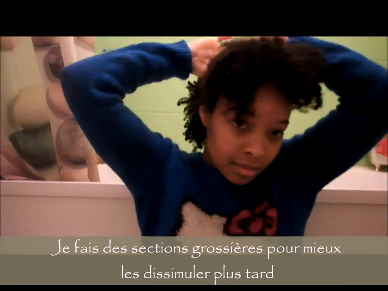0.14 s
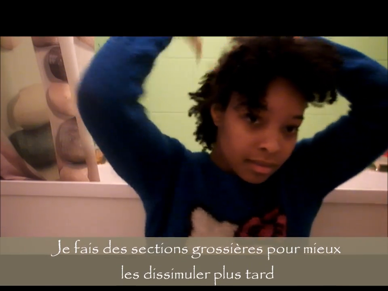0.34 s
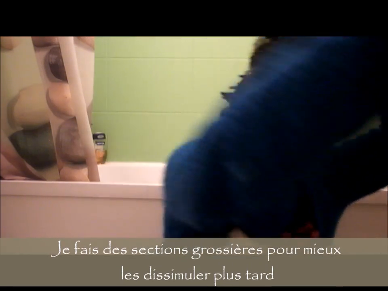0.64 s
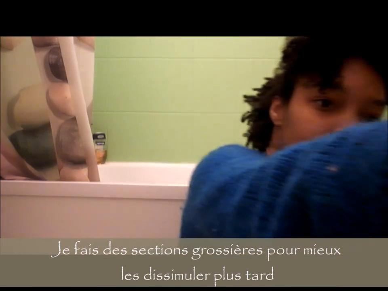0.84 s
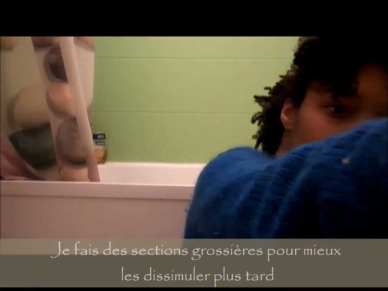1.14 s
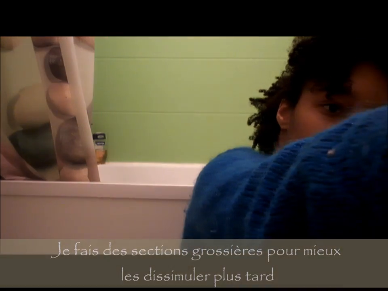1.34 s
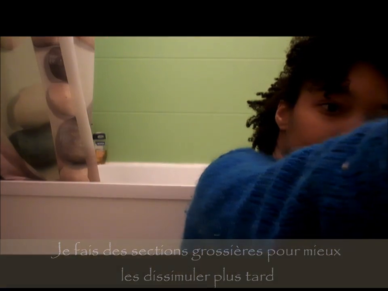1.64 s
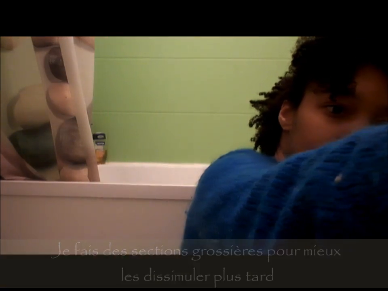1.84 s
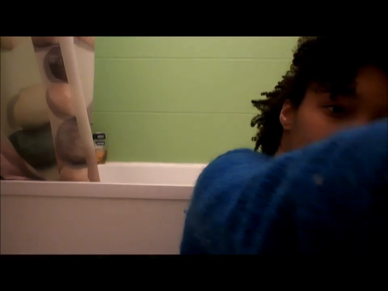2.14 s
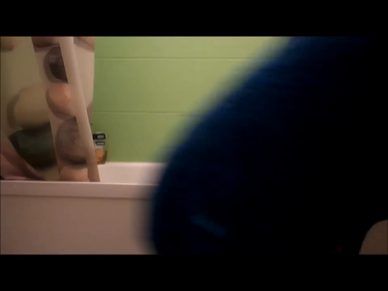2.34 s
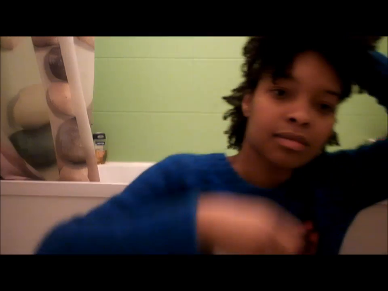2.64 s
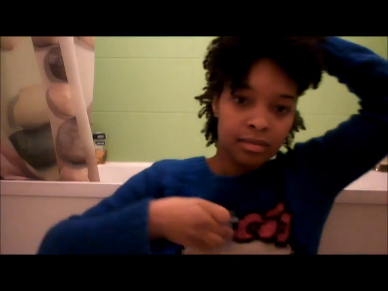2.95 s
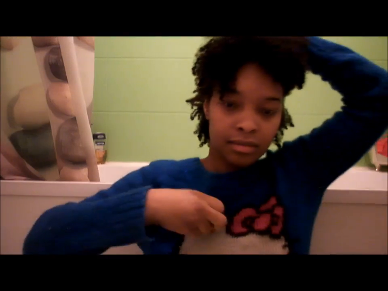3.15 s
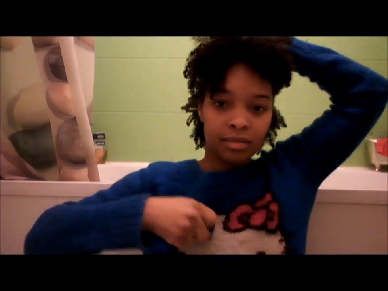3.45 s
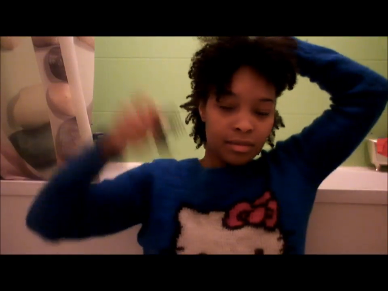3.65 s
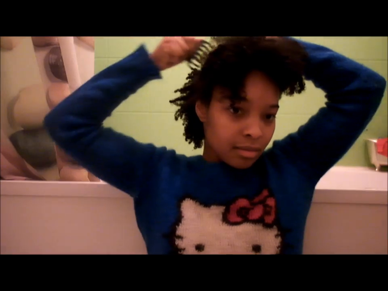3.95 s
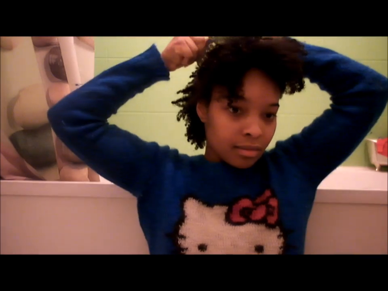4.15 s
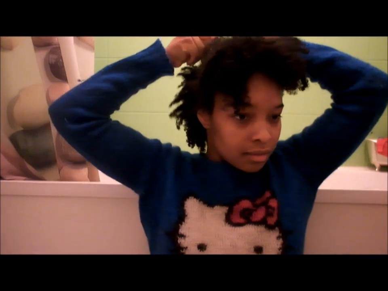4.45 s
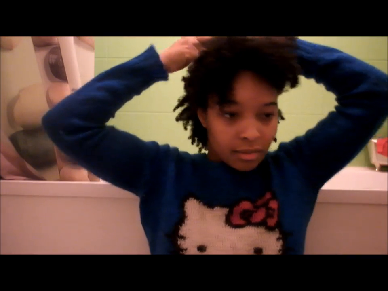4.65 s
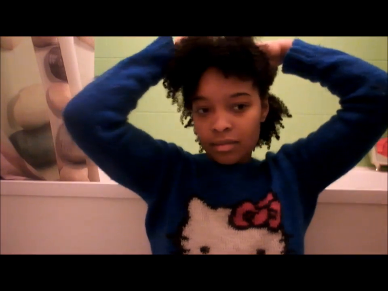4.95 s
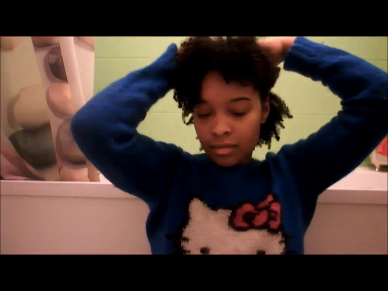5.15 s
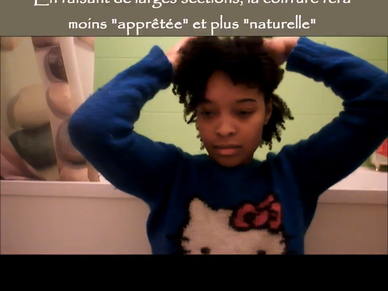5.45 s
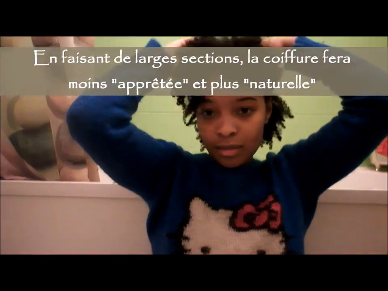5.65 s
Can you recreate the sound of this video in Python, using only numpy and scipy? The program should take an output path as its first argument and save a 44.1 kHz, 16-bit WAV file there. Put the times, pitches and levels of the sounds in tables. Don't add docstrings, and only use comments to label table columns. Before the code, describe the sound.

Soft hair rustle and tiny plastic clicks, then a loud burst of plastic clattering on a counter, then scattered sharp clicks in a small tiled bathroom.

```python
import sys
import numpy as np
from scipy import signal
from scipy.fft import rfft, irfft, next_fast_len
from scipy.io import wavfile

SR = 44100
rng = np.random.default_rng(int(sys.argv[2]) if len(sys.argv) > 2 else 0)


def wav_record(signal):
    frames = np.transpose(np.atleast_2d(signal))
    bounded = np.clip(frames, -1, 1)
    quanta = np.round(bounded * 32767).astype(np.int16)
    wavfile.write(sys.argv[1], SR, quanta)


def ratio_of_db(decibels):
    return 10 ** (np.asarray(decibels, float) / 20)


N = 256220
PLACES = 4


def evened(x):
    return x / np.sqrt(np.mean(x ** 2) + 1e-20)


def read(points, hz):
    point_hz, value = np.transpose(points)
    return np.interp(np.log(hz + 1), np.log(point_hz + 1), value)


def coloured(x, points):
    size = next_fast_len(len(x))
    gain = ratio_of_db(read(points, np.fft.rfftfreq(size, 1 / SR)))
    return irfft(rfft(x, size) * gain, size)[:len(x)]


def add(mix, start_s, sound):
    part = mix[round(start_s * SR):][:len(sound)]
    part += sound[:len(part)]


def ring(hz, t60):
    t = np.arange(6000) / SR
    pair = np.sin(2 * np.pi * hz * t) + 0.5 * np.sin(2 * np.pi * hz * 1.079 * t)
    return ratio_of_db(-60 * t / t60) * pair * np.minimum(t * hz, 1)


def grains(per_s, spread_db):
    size = ratio_of_db(spread_db * np.minimum(rng.exponential(1, N), 5))
    happens = rng.random(N) < per_s / SR
    return evened(size * rng.standard_normal(N) * happens)


def moves(peak_s, length_s, peak_db, end_db):
    off = abs(np.arange(N) / SR - peak_s[:, None]) / (length_s[:, None] / 2)
    each = ratio_of_db(peak_db[:, None] + end_db * off ** 1.4)
    return np.sqrt((each ** 2).sum(0))


# pitch_hz, level_db (per Hz)
FLOOR_COLOUR = [(12, -55.5), (20, -29.5), (48, -34.5), (69, -15.5), (117, -3.5), (153, -11.5), (217, 0),
                (252, -8.5), (493, -11), (572, -11.5), (617, -12), (1210, -16), (2950, -20), (5910, -24.5),
                (7580, -22), (9850, -82), (16700, -120)]
# pitch_hz, width_hz, level_db
FAN_HUM = (240, 130, -54.5)
# time_s, level_db
GAIN_DRIFT = [(0.0, 1), (0.352, 0), (0.776, 2), (0.98, 0.8), (2.2, -4), (2.65, -0.9), (3.32, -1.5),
              (3.57, -1), (4.21, -1.7), (4.62, 0.5), (5.81, -0.05)]


def floor():
    drift_s, drift_level_db = np.transpose(GAIN_DRIFT)
    drift_db = np.interp(np.arange(N) / SR, drift_s, drift_level_db)
    noise = coloured(rng.standard_normal(N), FLOOR_COLOUR)
    hiss = evened(noise - coloured(noise, [(500, 0.5), (1100, -18.5), (2500, -39.5)]))
    rumble = evened(coloured(noise, [(500, 4), (1100, -15.5), (2500, -58)]))
    hum_hz, width_hz, hum_db = FAN_HUM
    hum = signal.lfilter(*signal.iirpeak(hum_hz, hum_hz / width_hz, SR), rng.standard_normal(N))
    rumble = rumble + ratio_of_db(hum_db + 46.5) * evened(hum)
    return ratio_of_db(-51 + drift_db) * hiss + ratio_of_db(-48 + 0.65 * drift_db) * rumble


# pitch_hz, level_db
RUSTLE_COLOUR = [(800, -33.5), (2000, -18), (3000, 1), (4600, 2), (6500, -3), (8000, 0.5)]
# peak_s, length_s, level_db
HAIR_STROKES = [(.05, 0.23, -44), (0.357, 0.18, -38.5), (.7, 0.78, -48.5), (2.856, 0.99, -49.5),
                (3.395, 0.18, -48), (4.834, 0.47, -47), (4.897, .07, -36.5), (5.1, 0.19, -43),
                (5.338, 0.11, -42), (5.685, 0.55, -48.5)]


def rustle():
    crackle = evened(coloured(grains(8500, 1.4), RUSTLE_COLOUR))
    return moves(*np.transpose(HAIR_STROKES), end_db=-23.5) * crackle


# pitch_hz, level_db, t60_s (time to fall 60 dB)
COUNTER_MODES = [(686, -7.5, 0.087), (853, -10, 0.081), (1160, -5, 0.039), (1633, -4, 0.013),
                 (2350, -66.5, 0.016), (3600, -12.5, 0.067)]


def blows(rows, low_t60, high_t60, tick_hz, lift_db, rattle_db, counter_db, room_db, late_s):
    direct, sends = np.zeros(N), np.zeros((PLACES, N))
    chance = rng.standard_normal((len(rows), 2000))
    t = np.arange(6000) / SR
    modes = [ratio_of_db(db - 60 * t / t60) * np.sin(2 * np.pi * hz * t) for hz, db, t60 in COUNTER_MODES]
    counter = sum(modes) * np.minimum(t / 0.0024, 1)
    tick = signal.lfilter(*signal.butter(2, [tick_hz, 9000], "band", fs=SR), t == 0)
    tick = tick / tick.max()
    tick_lift, low_lift, high_lift = ratio_of_db(lift_db)
    for k, (start_s, tick_db, low_hz, low_db, high_hz, high_db) in enumerate(rows):
        low = ring(low_hz, low_t60) + ratio_of_db(counter_db) * counter
        sound = tick_lift * ratio_of_db(tick_db) * tick
        sound = sound + low_lift * ratio_of_db(low_db) * low
        sound = sound + high_lift * ratio_of_db(high_db) * ring(high_hz, high_t60)
        happens = abs(chance[k]) > 2.0
        bounces = ratio_of_db(rattle_db - 60 * t[:2000] / 0.048) * np.sign(chance[k]) * happens
        sound = sound + signal.fftconvolve(sound, bounces)[:6000]
        add(direct, start_s + late_s, sound)
        add(sends[k % PLACES], start_s + late_s, ratio_of_db(room_db) * sound)
    return direct, sends


# start_s, tick_db, ring_db, low_jaw_hz, high_jaw_hz
CLIP_SNAPS = [(0.051, -50, -42.5, 2990, 5100), (0.2885, -46, -42, 3130, 4730),
              (0.3699, -32.5, -32, 3090, 3530), (3.079, -27, -32.5, 2640, 6970),
              (3.3907, -60, -44, 2660, 6800), (3.6755, -36.5, -26.5, 2630, 4400),
              (3.703, -22, -18.5, 2550, 4930), (4.7066, -35, -28.5, 2860, 3700),
              (4.7433, -23.5, -22.5, 3470, 4830), (4.7523, -30.5, -29, 2860, 3560),
              (5.2443, -32.5, -33.5, 2130, 3200)]
# start_s, level_db, pitch_hz
TOOTH_PLUCKS = [
    (0.058, -42, 3120),
    (0.384, -30, 4300),
    (3.0366, -43, 6460),
    (5.2538, -28, 4720),
    (5.6556, -40.5, 4760),
]


def clip_snaps():
    rows = [(s, tick_db, low_hz, ring_db, high_hz, ring_db)
            for s, tick_db, ring_db, low_hz, high_hz in CLIP_SNAPS]
    rows += [(s, db - 24, hz * 0.635, db - 8, hz, db) for s, db, hz in TOOTH_PLUCKS]
    return blows(rows, low_t60=0.011, high_t60=0.011, tick_hz=3200, lift_db=[11, 5, 4.5],
                 rattle_db=-40, counter_db=-40, room_db=0.6, late_s=0.001216)


NAIL_FLICKS = [
    (0.337, -30, 3600),
    (3.063, -31, 3730),
    (3.6721, -24, 2400),
    (2.4925, -32.5, 2500),
    (2.6833, -40, 2520),
    (2.915, -36, 2530),
    (3.419, -36, 2900),
]


def nail_flicks():
    rows = [(s, db, hz, db, 1.35 * hz, db) for s, db, hz in NAIL_FLICKS]
    return blows(rows, low_t60=0.005, high_t60=0.005, tick_hz=1500, lift_db=[-3, 3, -2],
                 rattle_db=-40, counter_db=-40, room_db=-8.5, late_s=0.0012)


# start_s, level_db, pitch_hz
COUNTER_THUMPS = [(1.01, -29, 211), (1.042, -24.5, 199), (1.066, -21.5, 411), (1.129, -26, 592),
                  (1.278, -35.5, 423), (1.424, -28, 236.4), (1.455, -29, 380), (1.629, -22.5, 294),
                  (1.681, -15.5, 441), (1.735, -29, 293), (1.84, -9.5, 381), (1.856, -16.5, 280),
                  (1.881, -24, 451), (1.905, -35, 424), (1.995, -25.5, 523), (2.031, -24.5, 255),
                  (2.117, -51, 252)]


def thumps():
    out = np.zeros(N)
    for start_s, db, hz in COUNTER_THUMPS:
        t60 = 0.11 * ratio_of_db(-0.36 * (db + 21.5))
        add(out, start_s, ratio_of_db(db - 2.5) * ring(hz, t60))
    return out


# start_s, blow_db, edge_hz, body_db, body_hz
KNOCKS = [
    (1.0314, -19, 2640, -38, 1670),
    (1.0444, -22, 2410, -17, 1014),
    (1.0685, -3, 2700, -15.5, 1160),
    (1.1273, -12, 3000, -58, 608),
    (1.6788, -9, 3240, -11.5, 1210),
    (1.7344, -31, 3060, -32.5, 1060),
    (1.8382, -4, 4230, 0, 1410),
    (1.8484, -8.5, 3000, -7.5, 877),
    (1.9001, -11.5, 2910, -19.5, 721),
]
# start_s, blow_db, edge_hz, body_db, body_hz
GLANCES = [
    (1.0101, -11, 6730, -23, 1470),
    (1.0744, -9, 2430, -14, 1500),
    (1.3982, -27.5, 2720, -30, 1500),
    (1.4556, -15.5, 2560, -24, 1110),
    (1.6844, -11.5, 4740, -14, 1470),
    (1.8444, -8, 2310, -9, 1130),
    (1.9114, -14, 4380, -22, 785),
]
# start_s, blow_db, edge_hz, body_db, body_hz
EDGE_CLICKS = [
    (1.4556, -31.5, 5900, -43, 1090),
    (1.6282, -28.5, 5000, -31, 810),
    (2.0283, -33.5, 5900, -41, 1600),
    (1.2196, -40, 6900, -42, 1080),
]


def knocks():
    rows = []
    for table, tick_db in ((KNOCKS, -2.1), (GLANCES, -41.5), (EDGE_CLICKS, 10.5)):
        rows += [(s, blow_db + tick_db, body_hz, body_db, edge_hz, blow_db)
                 for s, blow_db, edge_hz, body_db, body_hz in table]
    return blows(rows, low_t60=0.012, high_t60=0.0097, tick_hz=2350, lift_db=[4, 4, -3],
                 rattle_db=-7.5, counter_db=-9.5, room_db=-4.5, late_s=0.001157)


# pitch_hz, level_db (per Hz)
SCRAPE_COLOUR = [(59, -65), (100, -22.5), (266, -1), (549, -9.5), (746, -8.5), (928, -10.5), (2750, -11.5),
                 (3120, -18.5), (6210, -36), (7580, -38), (9850, -81.5), (16700, -120)]
# peak_s, length_s, scrape_db, scratch_db
SLIDES = [(1.045, 0.061, -21.5, -19), (1.096, 0.25, -29.5, -40), (1.13, 0.06, -33, -41),
          (1.298, 0.042, -33, -36), (1.395, 0.064, -33.5, -33), (1.452, 0.08, -29.5, -36),
          (1.56, 0.23, -39.5, -38.5), (1.661, .09, -28.5, -40.5), (1.726, 0.1, -28, -36),
          (1.855, .1, -29.5, -41), (1.895, 0.081, -30.5, -23), (1.952, 0.056, -29.5, -30),
          (2.024, 0.036, -27.5, -32.5), (2.118, 0.043, -30, -49)]


def rummage():
    hz = np.geomspace(100, 8000, 200)
    lift = sum(ratio_of_db(db) / (1 + ((hz - mode_hz) / 70) ** 2) for mode_hz, db, _ in COUNTER_MODES)
    slips = coloured(grains(6000, 1.6), np.c_[hz, 20 * np.log10(0.6 + lift)])
    body = evened(coloured(slips, np.vstack([SCRAPE_COLOUR, (9000, -79)])))
    stand = evened(coloured(slips, [(40, -25), (70, 2.5), (130, -2), (220, -18)]))
    body = body + ratio_of_db(-10.5) * stand
    scratch = evened(coloured(grains(1500, 1.1), RUSTLE_COLOUR))
    peak_s, length_s, scrape_db, scratch_db = np.transpose(SLIDES)
    sound = moves(peak_s, length_s, scrape_db, end_db=-8) * body
    sound = sound + moves(peak_s, length_s, scratch_db, end_db=-8) * scratch
    begun = np.arange(N) / SR > GLANCES[0][0]
    return begun * ratio_of_db(-4.0) * sound


# start_s, body_hz, body_db, edge_db
HOLLOW_TAPS = [
    (1.2784, 766, -35.5, -28),
    (1.4264, 610, -35, -23),
    (1.8178, 738, -24, -24),
    (1.9924, 1015, -21, -19),
    (2.0804, 742, -23.5, -24.5),
    (2.1144, 996, -37, -26),
]


def hollow_taps():
    rows = [(s, -26.5, body_hz, body_db, 1488, edge_db) for s, body_hz, body_db, edge_db in HOLLOW_TAPS]
    return blows(rows, low_t60=0.061, high_t60=0.015, tick_hz=2500, lift_db=[-6, -3, -3],
                 rattle_db=-2.0, counter_db=-45.5, room_db=-2.0, late_s=0.0008)


TOOTH_TICKS = [(2.5457, -32.5, 2600), (3.2206, -30, 2800), (3.511, -34.5, 2970), (3.573, -55, 2370),
               (4.8388, -37, 2740), (4.8787, -35.5, 2860), (4.952, -28, 2430), (5.0511, -30, 3560),
               (5.4595, -47.5, 3020), (5.704, -37.5, 2080), (5.7366, -42.5, 3320)]


def tooth_ticks():
    rows = [(s, db, low_hz, db - 10, 5120, db - 17) for s, db, low_hz in TOOTH_TICKS]
    return blows(rows, low_t60=0.011, high_t60=0.011, tick_hz=3330, lift_db=[8, 3, 3],
                 rattle_db=-40, counter_db=-40, room_db=6, late_s=0.0013)


# pitch_hz, t60_s (time to fall 60 dB)
ROOM_DECAY = [(200, 0.24), (1000, 0.13), (2500, 0.18), (4500, 0.22), (7500, 0.23)]


def room(sends):
    taps = rng.standard_normal((len(sends), SR // 2))
    hz, t, z = signal.stft(taps, SR, nperseg=256)
    decay = ratio_of_db(-60 * t / read(ROOM_DECAY, hz)[:, None])
    tails = signal.istft(z * decay, SR, nperseg=256)[1]
    gap_s, build_s = 0.001, 0.012
    tails = tails * np.sqrt(np.clip((np.arange(tails.shape[1]) / SR - gap_s) / build_s, 0, 1))
    tails = tails / np.linalg.norm(tails, axis=1, keepdims=True)
    return signal.fftconvolve(sends, tails, axes=1)[:, :N].sum(0)


def scene():
    hair, boom, scrape = rustle(), thumps(), rummage()
    things = hair + boom + scrape
    sends = ratio_of_db(-18.0) * hair + ratio_of_db(-5) * boom + ratio_of_db(-9.5) * scrape + np.zeros((PLACES, 1))
    for source in (clip_snaps, nail_flicks, knocks, hollow_taps, tooth_ticks):
        direct, to_room = source()
        things = things + direct
        sends = sends + to_room
    things = things + room(sends)
    small = signal.lfilter(*signal.butter(2, 75, "high", fs=SR), things)
    return (small + floor())[None]


def roll_off(x):
    return signal.sosfilt(signal.butter(12, 7730, fs=SR, output="sos"), x)


# pitch_hz, level_db
BAND_LIMIT = [(6000, 0), (6900, -3.5), (7400, -11.5), (7700, -26.5), (8000, -49.5), (9000, -78)]


def record(dry):
    limited = coloured(dry[0], BAND_LIMIT)[None]
    return roll_off(np.clip(limited, -1, 1))


dry = scene()
out = record(dry)
wav_record(out)
```